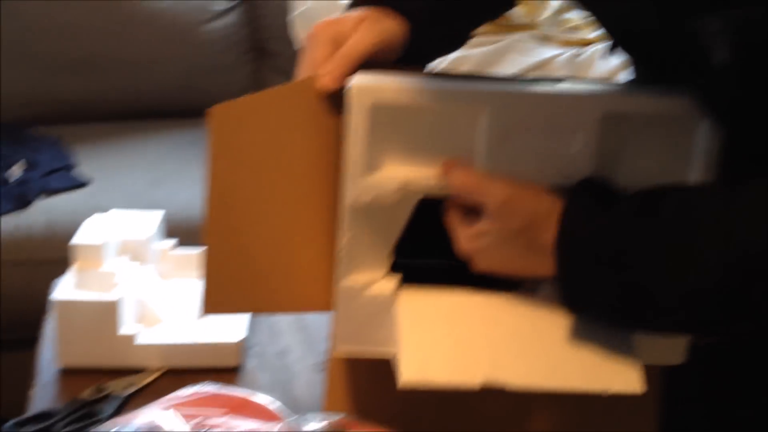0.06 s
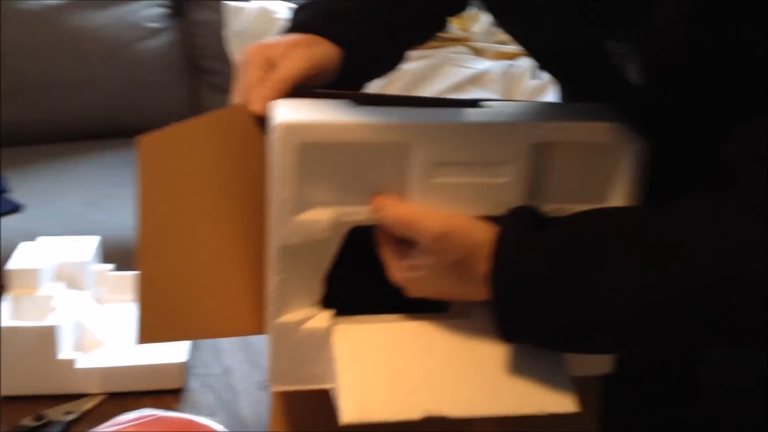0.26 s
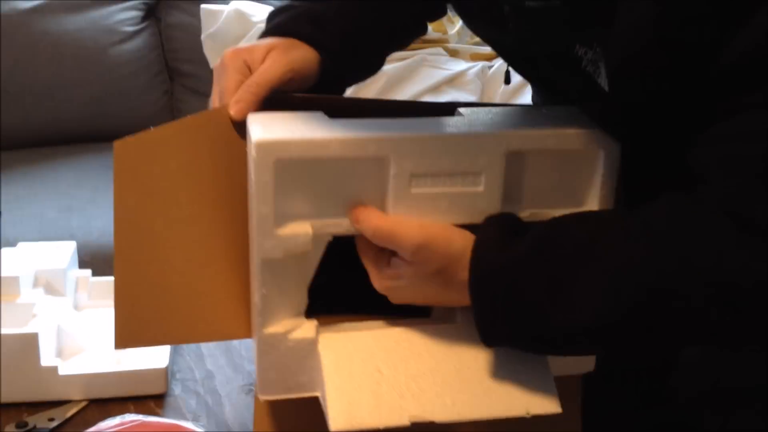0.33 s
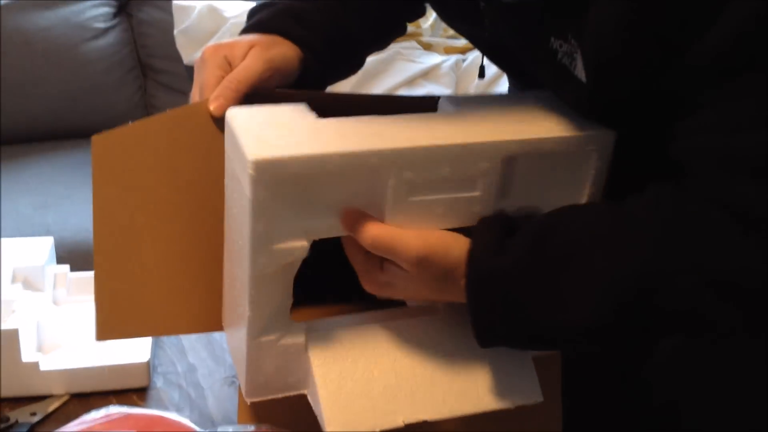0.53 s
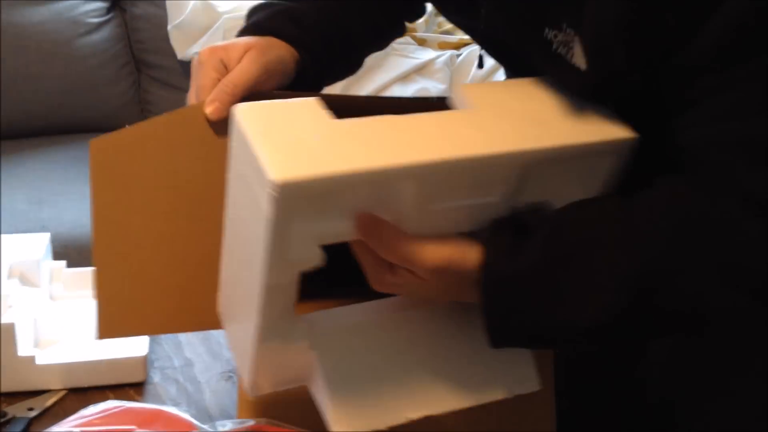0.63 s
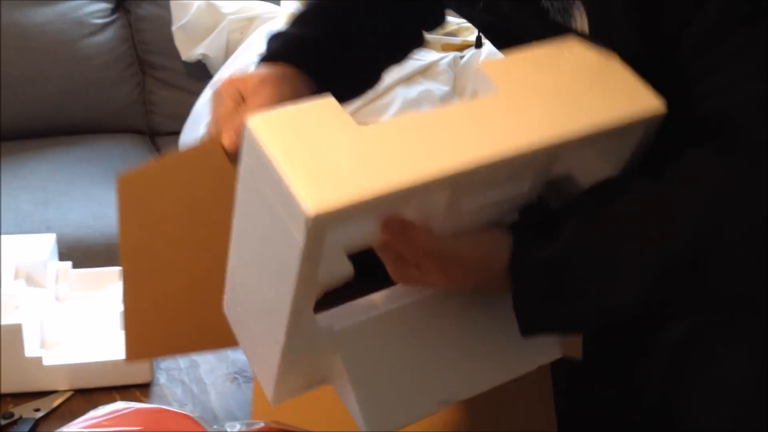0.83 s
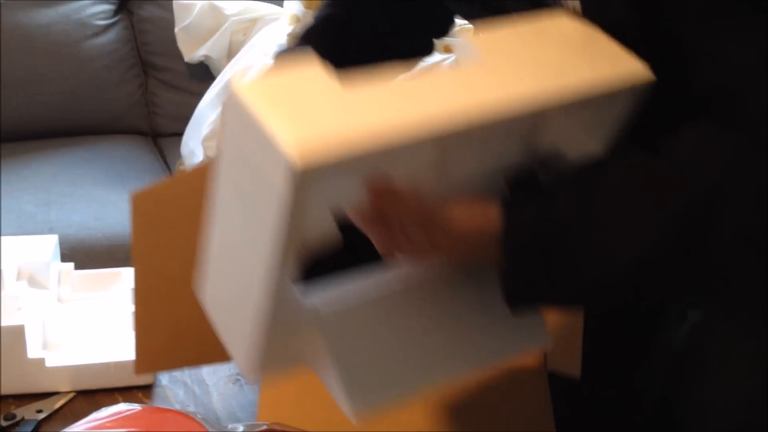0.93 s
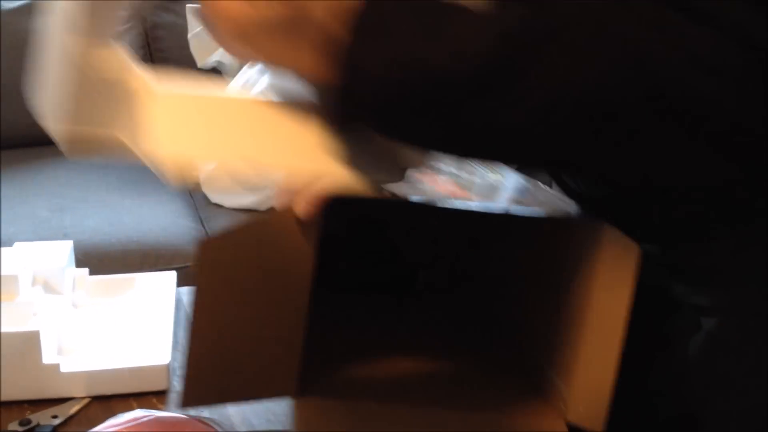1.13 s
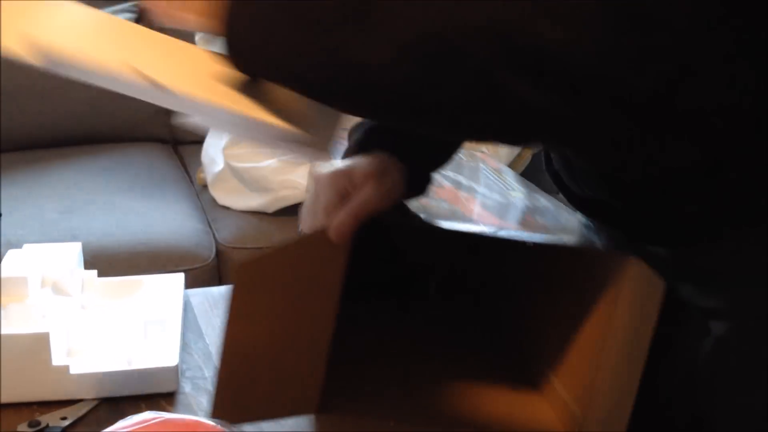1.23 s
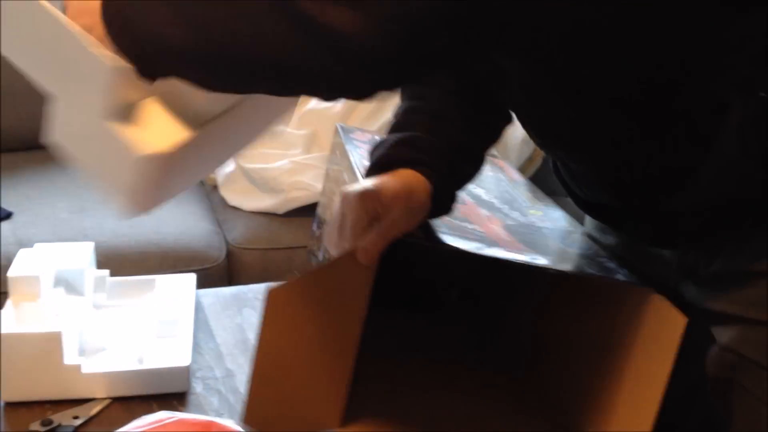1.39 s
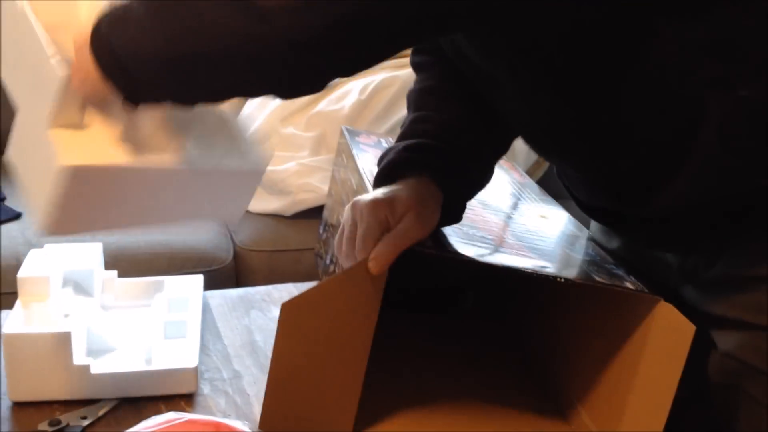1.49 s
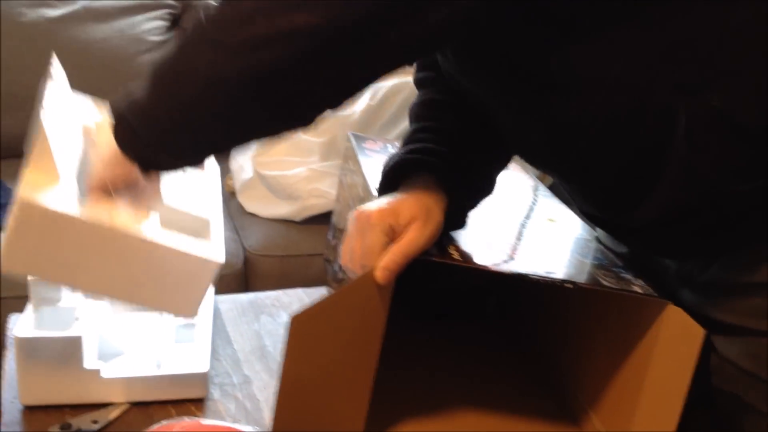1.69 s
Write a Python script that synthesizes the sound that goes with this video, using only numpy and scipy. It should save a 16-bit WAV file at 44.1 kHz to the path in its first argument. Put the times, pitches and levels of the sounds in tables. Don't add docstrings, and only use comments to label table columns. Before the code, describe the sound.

A foam packing block knocks hollowly against a cardboard box as it is pulled out indoors

```python
import sys
import numpy as np
from scipy import signal
from scipy.io import wavfile

SR = 44100
rng = np.random.default_rng(int(sys.argv[2]) if len(sys.argv) > 2 else 0)


def natural_amplitude(level_db):
    exponent = np.asarray(level_db, float) / 20
    return 10 ** exponent


def persist_wave(psi):
    counts = np.round(np.clip(psi, -1, 1) * 32767).astype(np.int16)
    wavfile.write(sys.argv[1], SR, np.atleast_2d(counts).T)


N = 77175

# start_s, boom_db, boom_centre_hz, clatter_db, snap_db
KNOCKS = [(0.001, -33, 312, -61, -33.5), (0.158, -29, 231, -43, -50), (0.170, -31.5, 230, -30, -68),
          (0.181, -28, 223, -30.5, -84), (0.223, -31, 228, -37, -72), (0.241, -5.5, 238.8, -7, -19),
          (0.264, -33, 282, -15.5, -28.5), (0.348, -23.5, 270, -23, -39.5),
          (0.395, -13.5, 330, -20.5, -23.5), (0.416, -14.5, 379.5, -17.5, -31.5),
          (0.435, -15.5, 279.8, -27, -33), (0.485, -57, 253, -24.5, -65), (0.502, -21.5, 235.7, -23.5, -89),
          (0.634, -40, 317.4, -19, -19), (0.637, -11.5, 291.5, -18, -32), (0.802, -37, 270, -62, -66),
          (1.044, -32, 293.6, -36.5, -62), (1.198, -48, 258, -36.5, -39.5), (1.412, -18, 183, -25, -45),
          (1.431, -33, 285, -24.5, -63), (1.465, -47, 292, -37, -45), (1.524, -40.5, 251, -30.5, -57),
          (1.55, -29.5, 240, -40, -55), (1.576, -28.5, 191.4, -60, -51)]
# mode_hz, level_db, t60_s
BOX_MODES = [(132.5, -4.5, 0.77), (184.2, 1, 0.55), (235.4, -2.5, 0.13), (247.7, -4, 0.28), (270, -3, 0.1),
             (288.46, 1, 0.11), (330, -0.5, 0.11), (393.7, -3.5, 0.17), (456, -15, 0.35),
             (498.5, -15.5, 0.35), (652, 0.5, 0.033), (835, -6.5, 0.025), (824, -11.5, 0.15),
             (1120, -8, 0.05)]
# time_s, level_db
STIR = [(0, -50), (.12, -48), (.2, -38.5), (.33, -33.5), (.45, -25), (.6, -34), (.72, -31.5), (.8, -42),
        (.87, -51.5), (1.01, -61), (1.1, -50), (1.17, -74), (1.3, -53), (1.38, -44), (1.5, -38),
        (1.6, -52.5), (1.66, -57), (1.75, -55)]
# band_hz, level_db_per_hz
CLATTER_COLOUR = [(290, 11), (500, -7), (769, -3), (941, -4), (1650, -7), (2230, -4.5), (2970, -13),
                  (6740, -13.5), (15500, -28)]
# band_hz, t60_s
CLATTER_TAIL = [(500, 0.36), (1500, 0.26), (3500, 0.18), (8000, 0.12), (15000, 0.15)]
# time_s, level_db
RUB_PRESSURE = [(0, -35), (.065, -44), (.10, -51.5), (.17, -47), (.32, -56.5), (.46, -56.5), (.6, -41.5),
                (.7, -52), (.85, -48), (.95, -44), (1.02, -40.5), (1.06, -54), (1.12, -49), (1.27, -48),
                (1.345, -41.5), (1.40, -49.5), (1.47, -60.5), (1.75, -60)]
# band_hz, level_db_per_hz
RUB_COLOUR = [(240, -27), (400, -14), (543, -54), (847, -15), (2030, 7.5), (3680, -11.5), (6190, -16),
              (12300, -13), (15500, 9)]
# centre_hz, width_hz, level_db
FOAM_MODES = [(2000, 810, -3.5), (6690, 5200, 0.5), (7800, 1800, -19.5), (12200, 500, -26)]
# centre_s, width_s, change_db
BRUSHES = [
    (.49, 0.076, 4.5),
    (1.39, 0.0053, 6.5),
    (1.668, 0.017, 10),
]
# time_s, level_db
DRAG = [(0, -56), (.12, -40.5), (.19, -39.5), (.23, -43), (.37, -30), (.45, -32.5), (.55, -31), (.62, -28),
        (.77, -49), (.86, -67), (1.01, -59), (1.17, -57), (1.29, -35.5), (1.365, -35), (1.395, -26.5),
        (1.5, -40), (1.62, -35), (1.75, -44)]
# band_hz, level_db_per_hz
DRAG_COLOUR = [(400, -12.5), (900, 1), (2000, -0.5), (3200, -8.5), (6000, -24)]
# centre_s, width_s, pitch_hz, level_db
SWISHES = [(0.033, 0.036, 7600, -36.5), (0.035, 0.027, 13300, -34.5), (0.84, 0.045, 12000, -46),
           (0.95, 0.021, 5200, -48.5), (1.04, 0.033, 12000, -41.5), (1.125, 0.028, 5900, -44.5),
           (1.14, 0.055, 2700, -48), (1.40, 0.023, 4800, -43.5), (1.3, .025, 14900, -52),
           (0.83, 0.046, 15000, -57), (.53, .03, 7700, -51), (0.99, .03, 6500, -55)]
# centre_s, width_s, change_db
LULLS = [
    (.121, .006, -18),
    (1.081, .006, -21),
    (1.316, .005, -17),
]
# centre_s, pitch_hz, level_db
SQUEAKS = [(.121, 2000, -49), (.121, 4160, -56), (.121, 5640, -48), (.121, 11000, -55), (1.081, 2000, -46),
           (1.081, 6000, -57), (1.081, 8320, -62), (1.316, 1520, -51), (1.316, 6070, -55),
           (1.314, 8560, -48), (1.662, 2700, -46.5), (1.048, 1100, -51)]
# start_s, level_db, pitch_hz, t60_s
TAPS = [(.241, -12, 758, 0.11), (.243, -8, 1853, 0.034), (.244, -19, 4500, 0.033), (.246, -26, 1430, .1),
        (.266, -16, 696, 0.064), (.267, -22, 2270, 0.038), (.273, -3, 287.5, 0.14),
        (.305, -32, 1210, 0.032), (.348, -13, 820, 0.036), (.356, -11, 257, 0.17), (.374, -28, 820, .03),
        (.396, -13.5, 820, .05), (.397, -13.5, 1880, 0.031), (.416, -14.5, 962, 0.062),
        (.417, -19.5, 502, 0.088), (.437, -18, 798, 0.053), (.447, -11.5, 284, 0.18), (.484, -24, 604, .04),
        (.491, -27, 2000, 0.034), (.53, -27, 842, 0.034), (.532, -24, 270, .1), (.635, -16, 1120, 0.066),
        (.638, -13.5, 2050, 0.028), (.65, -30, 1647, 0.086), (.646, -11.5, 278.3, 0.13),
        (.692, -27, 257, 0.13), (1.044, -29, 1056, 0.027), (1.196, -38, 1505, 0.069),
        (1.277, -36, 2470, .04), (1.289, -34.5, 422, 0.089), (1.325, -33.5, 413, 0.078),
        (1.34, -28.5, 1780, 0.023), (1.385, -34, 836, 0.071), (1.412, -36, 880, 0.017),
        (1.413, -25, 1180, 0.025), (1.417, -19.5, 291, 0.28), (1.428, -27, 972, 0.12),
        (1.445, -23, 760, 0.063), (1.463, -31, 2525, 0.047), (1.493, -28, 292, 0.18),
        (1.524, -30, 899, 0.033), (1.525, -33, 2000, 0.018), (1.546, -28, 872, 0.034),
        (1.55, -29, 1500, 0.032), (1.553, -35, 270, 0.073), (1.533, -26.5, 266, 0.11),
        (.503, -16.5, 253, 0.036), (.274, 0, 125, 0.081), (.398, -9.5, 393, 0.041), (.432, -15, 406, 0.11),
        (1.62, -30, 287, .08), (1.68, -38.5, 288, .12), (1.699, -44, 298, 0.087)]


def rms_one(x):
    return x / np.sqrt(np.mean(x ** 2) + 1e-20)


def filtered(x, order, hz, kind):
    return signal.sosfilt(signal.butter(order, hz, kind, fs=SR, output="sos"), x)


def in_time(rows):
    return np.interp(np.arange(N) / SR, *np.transpose(rows))


def at_hz(points, hz):
    table_hz, value = np.transpose(points)
    return np.interp(np.log(hz), np.log(table_hz), value)


def drift(rate_hz):
    r = np.exp(-80 * np.pi * rate_hz / SR)
    white = rng.standard_normal(N // 40 + 2002)
    slow = signal.lfilter([1], [1, -2 * r, r * r], white)[2000:]
    return np.interp(np.arange(N) / 40, np.arange(len(slow)), rms_one(slow))


def bell(centre_s, width_s, order=2):
    t = np.arange(N) / SR
    return np.exp(-.5 * ((t - centre_s) / width_s) ** order)


def bumps(rows, order=2):
    return natural_amplitude(sum(db * bell(s, width_s, order) for s, width_s, db in rows))


def ring(x, hz, t60_s):
    r, w = natural_amplitude(-60 / (t60_s * SR)), 2 * np.pi * hz / SR
    return signal.lfilter([0, np.sin(w)], [1, -2 * r * np.cos(w), r * r], x + 1e-18)


def bands(x):
    edges_hz = 350 * 2 ** np.arange(0, 5.6, .5)
    return [(np.sqrt(lo * hi), filtered(x[k % 2], 2, [lo, hi], "band"))
            for k, (lo, hi) in enumerate(zip(edges_hz, edges_hz[1:]))]


def grains(per_s, spread_db):
    size = natural_amplitude(spread_db * np.minimum(rng.exponential(1, (2, N)), 5))
    signed = size * rng.choice([-1, 1], (2, N))
    return rms_one(signed * (rng.random((2, N)) < per_s / SR))


def clicks(db):
    out = np.zeros(N)
    out[(np.array(KNOCKS)[:, 0] * SR).astype(int)] = natural_amplitude(db)
    return out


def dying(db, t60_s):
    power = clicks(db) ** 2 + 1e-18
    return np.sqrt(signal.lfilter([1], [1, -natural_amplitude(-120 / (t60_s * SR))], power))


def boom():
    boom_db, mode_spread_db, centre_gain_db, centre_oct = 3, 4.5, 10, .25
    max_t60_s, push_hz, drag_per_s = .22, 890, 550
    rows = np.array(KNOCKS)
    chance = rng.standard_normal((len(KNOCKS), len(BOX_MODES)))
    stir = natural_amplitude(in_time(STIR) - 21.0 + 2.2 * drift(16.0)) * filtered(grains(drag_per_s, 3.1), 2, 230, "high")
    out = 0
    for k, (hz, db, t60_s) in enumerate(BOX_MODES):
        near_db = centre_gain_db * np.exp(-.5 * (np.log2(hz / rows[:, 2]) / centre_oct) ** 2)
        hit = clicks(rows[:, 1] + boom_db - 10.5 + near_db + mode_spread_db * chance[:, k])
        out = out + ring(hit + stir[k % 2], hz, min(t60_s, max_t60_s)) * natural_amplitude(db - 5.5)
    return filtered(out, 1, push_hz, "low")


def strike(out, start_s, level_db, hz, t60_s, rise_s):
    t = np.arange(SR // 4) / SR
    i = int(start_s * SR)
    envelope = natural_amplitude(level_db - 60 * t / t60_s) * (1 - np.exp(-t / rise_s))
    out[i:i + len(t)] += envelope * np.sin(2 * np.pi * hz * t)


def walls():
    wall_db, t60_s, rise_s = 0.5, 0.19, 0.0016
    out = np.zeros(N + SR)
    for start_s, boom_db, hz, *_ in KNOCKS:
        strike(out, start_s, boom_db + wall_db, hz, t60_s, rise_s)
    return out[:N]


def clatter():
    clatter_db, split_hz = -6, 3200
    snap_db, snap_t60_s = 3, 0.031
    tick_db, tick_t60_s = -2, 0.0035
    rows, out = np.array(KNOCKS), 0
    mid_ref_db = at_hz(CLATTER_COLOUR, 1500) - 9
    top_ref_db = at_hz(CLATTER_COLOUR, 8000) - 3
    for hz, noise in bands(rng.standard_normal((2, N))):
        share = 1 / (1 + (split_hz / hz) ** 4)
        knock_db = (1 - share) * (rows[:, 3] - mid_ref_db) + share * (rows[:, 4] - top_ref_db)
        db = at_hz(CLATTER_COLOUR, hz) + knock_db + clatter_db
        tail = dying(db, at_hz(CLATTER_TAIL, hz)) * natural_amplitude(2.05 * drift(57))
        snap = dying(db + snap_db, snap_t60_s)
        tick = dying(db + tick_db, tick_t60_s)
        out = out + noise * (tail + snap + tick)
    return out


def thud():
    thud_db, rise_s, top_hz = -15, 0.024, 137
    r = np.exp(-1 / (rise_s * SR))
    hits = clicks(np.array(KNOCKS)[:, 1] + thud_db)
    swell = signal.lfilter([np.e * (1 - r)], [1, -2 * r, r * r], hits)
    return swell * rms_one(filtered(rng.standard_normal(N), 2, top_hz, "low"))


def rub():
    grains_per_s, bright_per_db = 6500, 0.11
    flicker_db, patch_db, patch_hz = 1.3, 2.5, 5
    together, press_db = drift(17), in_time(RUB_PRESSURE)
    tilt_db_per_oct = bright_per_db * (press_db + 48)
    hiss = 0
    for hz, beads in bands(grains(grains_per_s, 1.0)):
        wander_db = flicker_db * together + patch_db * drift(patch_hz)
        db = at_hz(RUB_COLOUR, hz) + wander_db + tilt_db_per_oct * np.log2(hz / 5000)
        hiss = hiss + beads * natural_amplitude(db)
    white = rng.standard_normal(N)
    rings = sum(rms_one(ring(white, hz, 3.36 / width_hz)) * natural_amplitude(db + 2.55 * drift(4.2))
                for hz, width_hz, db in FOAM_MODES)
    return natural_amplitude(press_db) * (rms_one(hiss) + rings)


def scuff():
    dull = sum(x * natural_amplitude(at_hz(DRAG_COLOUR, hz) + 2.15 * drift(55)) for hz, x in bands(grains(2500, 0.48)))
    return natural_amplitude(in_time(DRAG) - 8) * rms_one(dull)


def swishes():
    t60_cycles = 15
    return sum(natural_amplitude(db) * bell(s, width_s) * rms_one(ring(rng.standard_normal(N), hz, t60_cycles / hz))
               for s, width_s, hz, db in SWISHES)


def squeaks():
    width_s, t60_s = 0.013, 0.027
    return sum(natural_amplitude(db) * bell(s, width_s) * rms_one(ring(rng.standard_normal(N), hz, t60_s))
               for s, hz, db in SQUEAKS)


def taps():
    rise_cycles = 0.2
    out = np.zeros(N + SR)
    for start_s, db, hz, t60_s in TAPS:
        strike(out, start_s, db, hz, t60_s, rise_cycles / hz)
    return out[:N]


def room(x):
    room_db, t60_s, rise_s = -7, 0.25, 0.0061
    t = np.arange(SR // 2) / SR
    tail = rng.standard_normal(len(t)) * natural_amplitude(-60 * t / t60_s) * (1 - np.exp(-t / rise_s))
    return natural_amplitude(room_db) * signal.fftconvolve(x, tail / np.sqrt(np.sum(tail ** 2)))[:N]


def scene():
    air_db = -83
    box = boom() + walls() + taps()
    hiss = rub() * bumps(BRUSHES) + scuff() + natural_amplitude(air_db) * rng.standard_normal(N)
    hiss = filtered(hiss, 2, 250, "high")
    dips = bumps(LULLS, order=4)
    mix = box + room(box) + squeaks() + thud() + dips * (clatter() + hiss + swishes())
    return mix[None]


def band_limit(x):
    return signal.sosfilt(signal.butter(12, 16510, fs=SR, output="sos"), x)


def record(dry):
    low_cut_hz, top_cut_hz = 177.5, 15400
    x = filtered(dry, 3, low_cut_hz, "high")
    x = 0.99 * np.tanh(x / 1.41)
    top_cut = signal.cheby2(14, 42, top_cut_hz, fs=SR, output="sos")
    return band_limit(signal.sosfilt(top_cut, x))


dry = scene()
out = record(dry)
persist_wave(out)
```